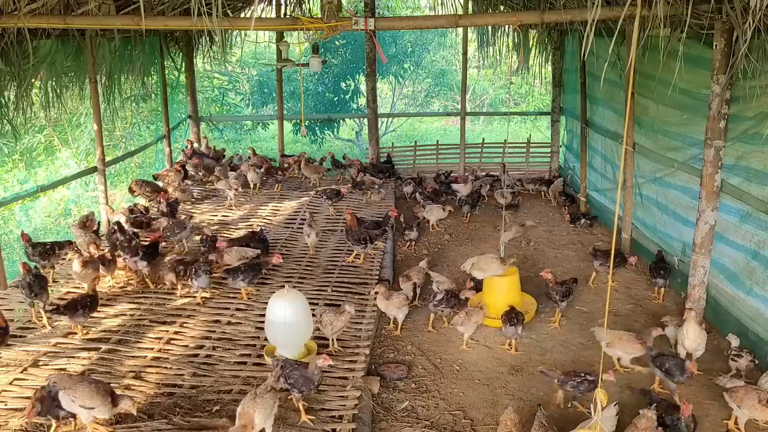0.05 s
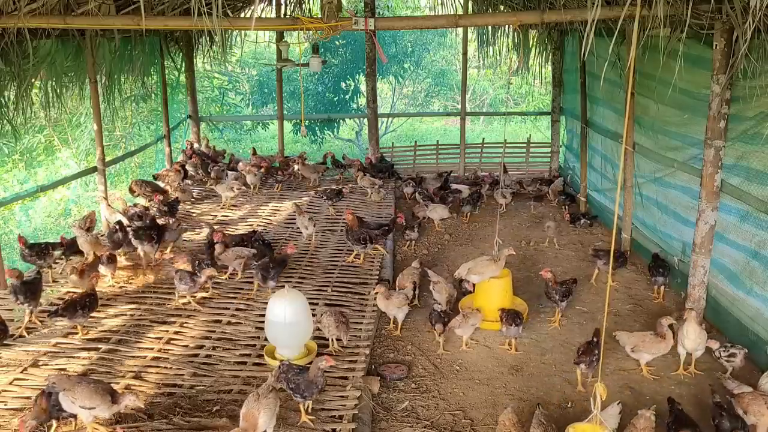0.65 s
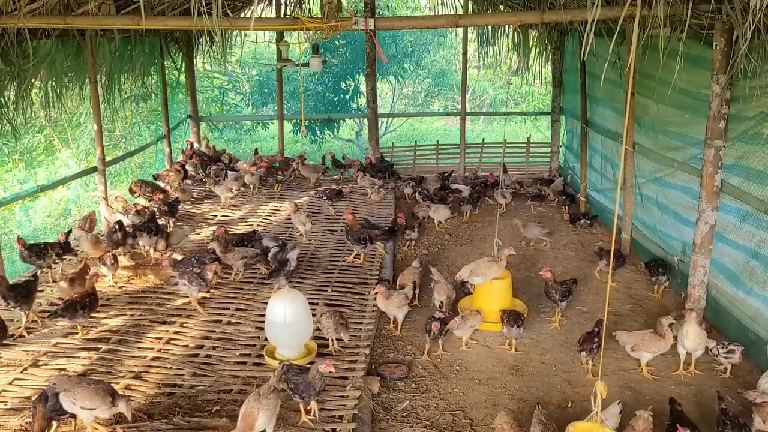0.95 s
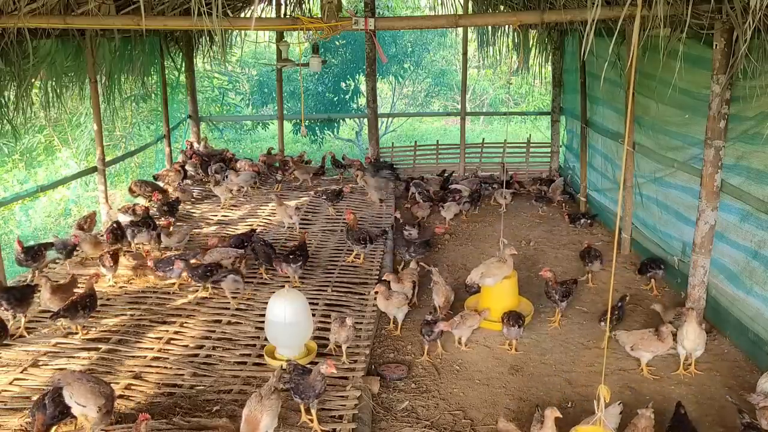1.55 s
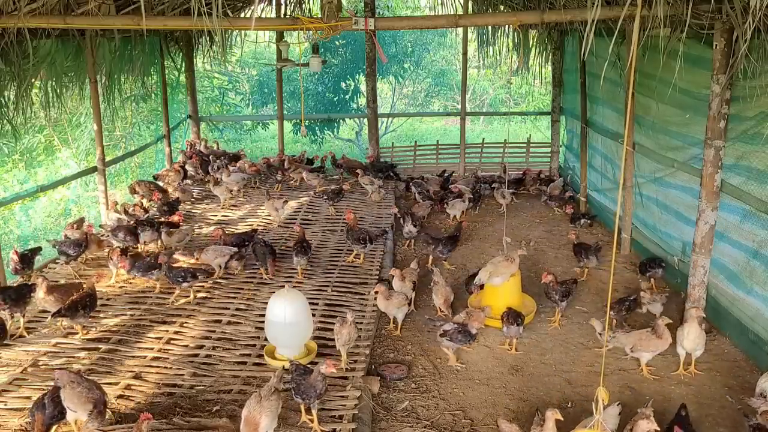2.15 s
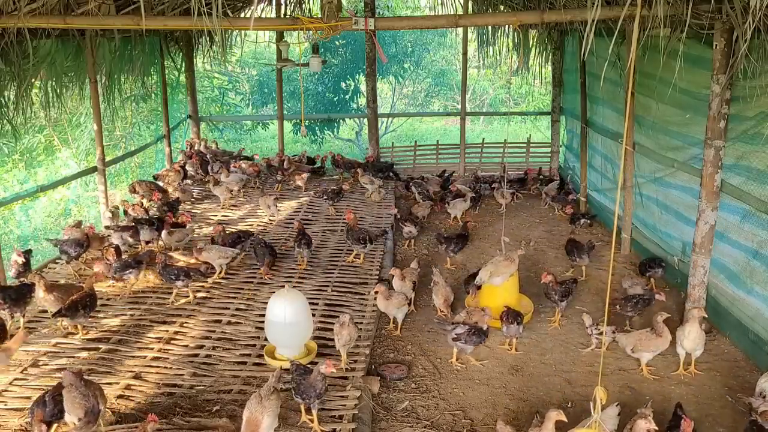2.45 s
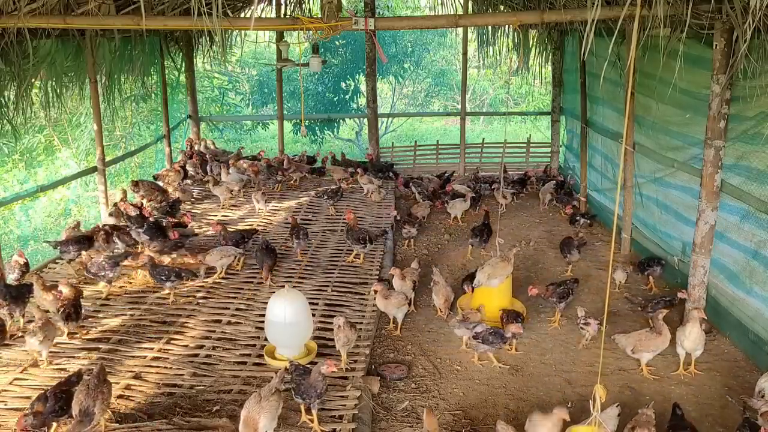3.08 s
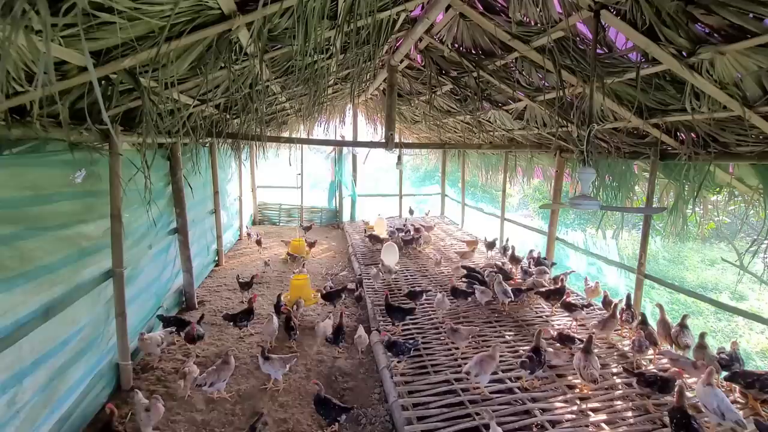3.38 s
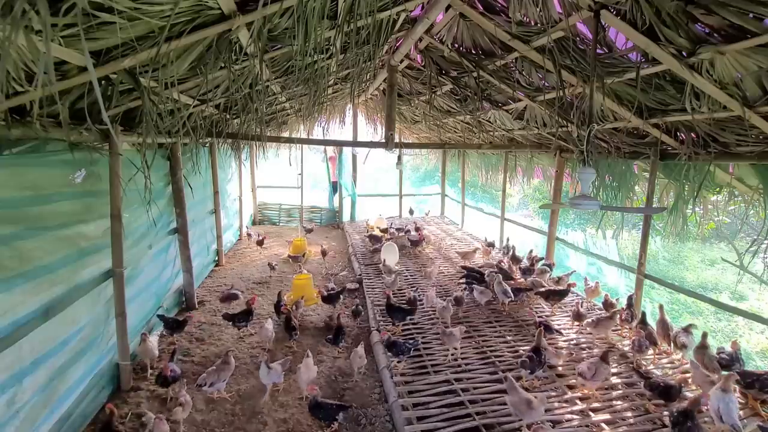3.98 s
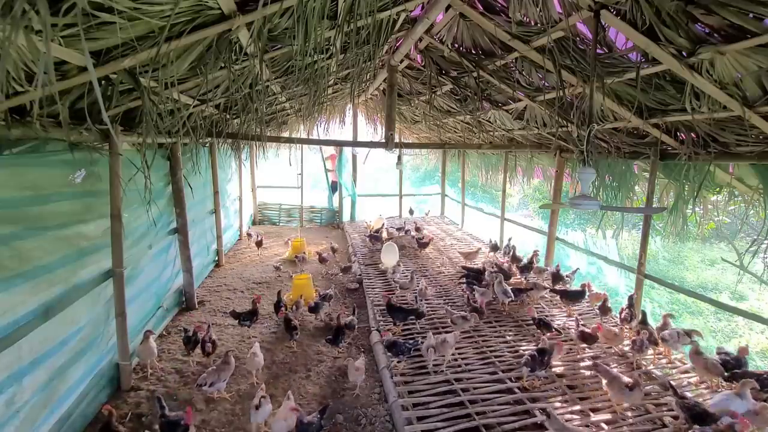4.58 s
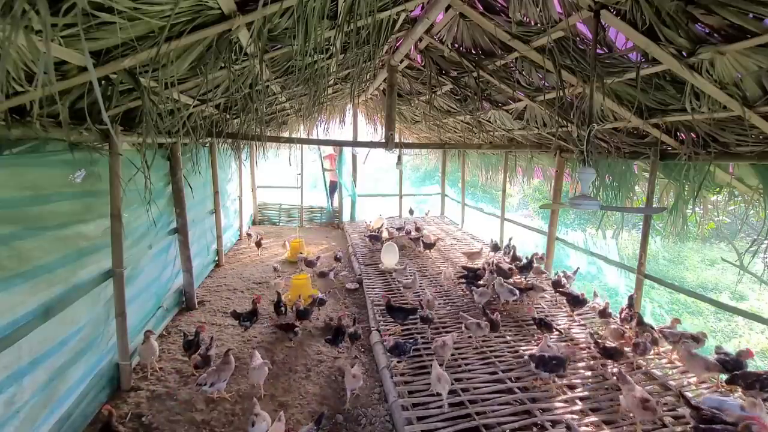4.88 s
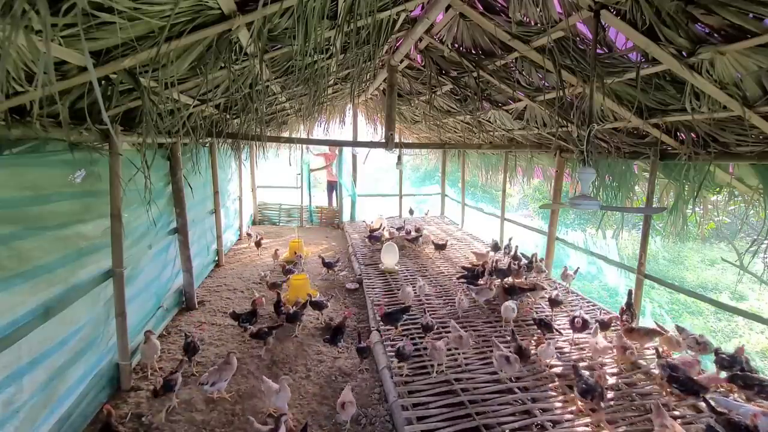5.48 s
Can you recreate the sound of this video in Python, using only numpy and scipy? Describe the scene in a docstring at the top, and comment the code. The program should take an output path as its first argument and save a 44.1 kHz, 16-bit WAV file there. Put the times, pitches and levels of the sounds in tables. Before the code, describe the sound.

A large flock of young chickens peeps continuously inside a thatched coop, near birds standing out with falling cheeps and brief hoarse squawks. Beaks tick, feet scratch through straw and wings thump softly on bamboo slats. Crickets trill outside and an engine thuds faintly far off. After a quavering call and a brief silence midway, the flock returns without the engine and grows busier.

```python
"""A thatched coop with netted sides, where young chickens peep and squawk, peck and flap on bamboo slats.
Each voice is a modulated tone from the membranes of the syrinx; impacts excite the modes of the floor.
Outside, crickets stridulate and the exhaust pulses of a slow single-cylinder engine thud far off.
After a brief silence the flock is heard from the other end of the coop, without the engine and with
one cricket nearer."""
import sys
import numpy as np
from scipy import signal
from scipy.fft import rfft, irfft, next_fast_len
from scipy.io import wavfile
from scipy.ndimage import map_coordinates

SR = 44100
rng = np.random.default_rng(int(sys.argv[2]) if len(sys.argv) > 2 else 0)


def inscribe(sig):
    """Save sig as 16-bit PCM at rate SR to the path in sys.argv[1].

    A 1-D sig is mono; a 2-D sig holds one channel per row.
    Samples are clipped to [-1, 1] before scaling.
    """
    pcm = np.round(np.clip(np.atleast_2d(sig).T, -1, 1) * 32767)
    wavfile.write(sys.argv[1], SR, pcm.astype(np.int16))


N = 243873
TIME = np.arange(N) / SR
MOVE_S = 3.37  # from here on the listener is at the other end


def undb(db):
    """Amplitude ratio of a level in decibels."""
    return 10 ** (np.asarray(db) / 20)


def unit(x):
    """Normalisation to unit rms."""
    return x / np.sqrt(np.mean(x ** 2) + 1e-20)


def curve(table, axis=1):
    """Linear interpolation of one column of a table over time."""
    rows = np.array(table)
    return np.interp(TIME, rows[:, 0], rows[:, axis])


def response(hz, points):
    """Magnitude response, interpolated in decibels over log frequency."""
    f, db = np.transpose(points)
    return undb(np.interp(np.log(hz + 1e-9), np.log(f), db, left=-90, right=-90))


def colour(x, points):
    """Zero-phase filtering by multiplication of spectra."""
    n = x.shape[-1]
    size = next_fast_len(n)
    return irfft(rfft(x, size) * response(np.fft.rfftfreq(size, 1 / SR), points), size)[..., :n]


def wander(n, rate):
    """Smooth random modulation of spread near 1, through `rate` random values a second."""
    knots = rng.standard_normal(int(n / SR * rate) + 4)
    return map_coordinates(knots, [np.arange(n) / SR * rate + 1], order=2, mode="nearest")


def stereo_noise(n, side):
    """Partly coherent noise at the two ears: side 0 is centred, side 1 diffuse."""
    mid, wide = rng.standard_normal((2, n))
    return np.array([mid + side * wide, mid - side * wide])


def add(out, s, sound, pan_db=0, lag=0):
    """Mix in at time s with interaural differences: the left ear is pan_db louder, lag samples earlier."""
    for ear, sign, x in zip(out, (1, -1), np.broadcast_to(sound, (2, sound.shape[-1]))):
        start = int(np.clip(s * SR - sign * lag / 2, 0, N))
        gain = undb(sign * pan_db / 2) / np.sqrt(np.cosh(pan_db * np.log(10) / 20))
        ear[start:start + len(x)] += x[:N - start] * gain


def lead(s, scatter=0):
    """Interaural delay of a near bird in samples; it scatters because each stands somewhere else."""
    return (3 if s < MOVE_S else -2.1) + (scatter * rng.normal() if scatter else 0)


def coop(x, t60_s, wet_db):
    """Reverberation: thatch and netting return only a short, sparse train of echoes."""
    t = np.arange(SR // 4) / SR
    echoes = rng.standard_normal((2, len(t))) * (rng.random((2, len(t))) < .05)
    echoes *= (t > .003) * undb(-60 * t / t60_s)
    echoes /= np.sqrt(np.sum(echoes ** 2, axis=1, keepdims=True))
    return x + undb(wet_db) * signal.fftconvolve(x, echoes, axes=1)[:, :x.shape[1]]


def placed(note, t60_s=0.18, wet_db=-5.5, bounce_db=-11, bounce_s=0.004):
    """Comb filtering: reflections off floor and posts colour each call anew, at constant energy."""
    direct = np.pad(note, (0, SR // 8))
    delays = (rng.uniform(.1, 1, (2, 2)) * bounce_s * SR).astype(int)
    early = np.array([direct + undb(bounce_db) * sum(np.roll(direct, d) for d in ear) for ear in delays])
    heard = coop(early, t60_s, wet_db)
    return heard * np.sqrt(np.sum(note ** 2) / np.sum(heard ** 2, axis=1, keepdims=True))


# Background spectrum: f/Hz, level/dB (levels in all tables are relative)
AIR_SPECTRUM = [(25, -24), (60, 8.5), (150, -22), (400, -18), (900, -7), (2000, -9.5), (5000, -14.5),
                (16000, -15.5)]
def air():
    """Diffuse background noise, strongest in the bass."""
    return unit(colour(stereo_noise(N, 1.0), AIR_SPECTRUM)) * undb(-67.5)


def wing_stroke(hz, length, drop):
    """Stridulation: one stroke of a cricket's file, sinking in pitch as the wings slow."""
    u = np.linspace(0, 1, int(length * SR))
    return np.sin(2 * np.pi * np.cumsum(hz * (1 - drop * u)) / SR) * np.sin(np.pi * u)


# Trilling crickets: f/Hz, stroke rate/Hz, fractional fall in pitch, level/dB
CRICKET_TRILLS = [(4466, 27.5, 0.062, -51.5), (4333, 33, 0.018, -50), (4840, 19, 0.062, -54.5),
                  (5150, 31, 0.16, -51)]
# Spectrum of the chorus at the first end: f/Hz, level/dB
FIRST_CHORUS = [(2290, -43), (3900, 4.5), (3970, -14.5), (4210, 10), (4410, 10.5), (4930, 7), (5090, 4.5),
                (5340, -18.5), (5600, -17), (7280, -31.5), (9900, -33), (10800, -7.5), (11700, -32),
                (13000, -80)]
def distant_crickets():
    """Superposition: pulsed trills and one dying note over a chorus blurred to noise; all slowly weaken."""
    out = np.zeros((2, N))
    for hz, rate, drop, db in CRICKET_TRILLS:
        for s in np.arange(0, MOVE_S, 1 / rate):
            stroke = wing_stroke(hz * (1 + 0.0043 * rng.normal()), 0.0218, drop)
            add(out, s + .0015 * rng.normal(), stroke * undb(db + 3.3 * rng.normal()), lag=2.55)
    ringing_hz = 4200 * (1 + 0.0129 * wander(N, 90))
    out += np.sin(2 * np.pi * np.cumsum(ringing_hz) / SR) * undb(-48 - 12 * TIME)
    out += unit(colour(stereo_noise(N, 1), FIRST_CHORUS)) * undb(-49.5 + 2.3 * wander(N, 70))
    return out * undb(1 - 0.86 * TIME) * (TIME < MOVE_S)


# Running of the engine: t/s, firing rate/Hz, level/dB
ENGINE_RUN = [(0.0, 28.38, -52), (1.41, 26.73, -55.5), (2.02, 28.81, -54), (2.47, 30, -56),
              (2.95, 32.68, -59), (3.3, 35.45, -59)]
# Spectrum of the distant exhaust: f/Hz, level/dB
EXHAUST_SPECTRUM = [(20, -26.5), (38, -15), (55, -0.5), (85, -6), (112, 2.5), (140, 0.5), (175, -17.5),
                    (260, -7), (400, -44.5), (900, -82)]
def engine():
    """Source and filter: uneven firing pulses and noise excite the exhaust; distance leaves the bass."""
    cycles = np.floor(np.cumsum(curve(ENGINE_RUN)) / SR)
    firings = np.diff(cycles, prepend=0) * undb(2 * wander(N, 25.42))
    thuds = unit(colour(unit(firings) + stereo_noise(N, 0.27), EXHAUST_SPECTRUM))
    out = np.zeros((2, N))
    add(out, 0, thuds * undb(curve(ENGINE_RUN, axis=2) + 2.0) * (TIME < MOVE_S), lag=16)
    return out


# Activity of the flock: t/s, level/dB
FLOCK_ACTIVITY = [(0.0, -47.5), (0.42, -49), (1.3, -52), (2.13, -53.5), (2.6, -57), (2.9, -40),
                  (3.1, -52.5), (3.58, -64), (3.744, -56.5), (4.636, -51), (5.008, -45), (5.53, -45.5)]
def bustle_db():
    """Common envelope of the flock's faint sounds, in decibels above its usual activity."""
    return curve(FLOCK_ACTIVITY) + 50


# Spectra of the straw and of the floor under it: f/Hz, level/dB
STRAW_SPECTRUM = [(3180, -16.5), (5400, -4), (6390, -8.5), (8030, -5), (8810, -13), (10800, -3.5),
                  (13600, -21.5), (14900, -20), (15500, -30)]
FLOOR_SPECTRUM = [(90, -1), (170, -9), (280, 2), (420, -5), (600, -6.5), (900, -12.5), (1400, -15),
                  (2500, -33)]
def shuffling():
    """Random impacts of many feet sum to noise: crackling straw above, a dull patter below."""
    snaps = (rng.random(N) < 70 / SR) * np.minimum(undb(4.0 * rng.exponential(size=N)), 6)
    rustle = np.exp(0.073 * wander(N, 500) + 0.32 * wander(N, 21.97))
    crackle = signal.lfilter([1], [1, -np.exp(-1 / (0.00043 * SR))], snaps)
    straw = unit(colour(stereo_noise(N, 0.97) * (rustle + 0.53 * crackle), STRAW_SPECTRUM))
    patter = unit(colour(stereo_noise(N, 0.34) * np.exp(0.36 * wander(N, 35)), FLOOR_SPECTRUM))
    return straw * undb(-60.5 + 0.45 * bustle_db()) + patter * undb(-60 + 0.74 * bustle_db())


# Response of throat and open beak to the overtones: f/Hz, level/dB
VOCAL_TRACT = [(600, -30), (1400, 3), (2400, 15.5), (3400, 1.5), (4800, 4.5), (6000, -9.5), (7700, -2),
               (10000, -5), (15000, -50.5)]
def syrinx(glide, waver, waver_hz, flutter, overtone_db, rasp, spread):
    """A harmonic whistle under random modulation of frequency (waver) and amplitude (flutter)."""
    n = len(glide)
    phase = 2 * np.pi * np.cumsum(glide * (1 + waver * wander(n, waver_hz))) / SR
    overtones = sum(response(k * glide, VOCAL_TRACT) * np.sin(k * phase) / (k - 1) for k in range(2, 6))
    # irregular flapping of the membranes adds noisy sidebands, heard as rasp
    spread_hz = spread * glide.mean()
    whistle = (1 + rasp * wander(n, spread_hz)) * np.sin(phase)
    whistle += rasp * wander(n, spread_hz) * np.cos(phase)
    envelope = unit(np.exp(flutter * wander(n, waver_hz)))
    return np.sqrt(2) * (whistle + undb(overtone_db) * overtones) * envelope


def call(length, pitches, edge_s, **voice):
    """A parabolic frequency glide through three pitches, with raised-cosine edges."""
    t = np.arange(int((length + edge_s) * SR)) / SR
    progress = np.clip((t - edge_s / 2) / length, -.1, 1.1)
    glide = np.polyval(np.polyfit([0, .5, 1], pitches, 2), progress)
    opening = np.sin(np.pi / 2 * np.clip(np.minimum(t, t[-1] - t) / edge_s, 0, 1)) ** 2
    return syrinx(glide, **voice) * opening


def fall(start_hz, end_hz, sag=0):
    """Start, middle and end frequency of a glide that sags below a straight line."""
    return np.array([start_hz, (start_hz + end_hz) / 2 * (1 - sag), end_hz])


def far_peeps(count=460):
    """Incoherent sum of many faint falling peeps from the rest of the flock."""
    out = np.zeros((2, N))
    for k, (when, span, pitch, drop, loud, place) in enumerate(rng.random((count, 6))):
        top_hz = 2250 + 1550 * pitch
        pitches = top_hz * (1 - (0.0726 + .22 * drop) * np.array([0, .42, 1]))
        note = call(0.02817 + .055 * span, pitches, edge_s=0.0144, waver=0.012, waver_hz=198,
                    flutter=0.25, overtone_db=-32.5, rasp=0.4, spread=0.29)
        s = (k + when) / count * N / SR - .04
        add(out, s, note * undb(7.6 * loud - 3 * pitch), 10 * (place - .5), lag=36 * (place - .5))
    return unit(out) * undb(-51.5 + 0.78 * bustle_db())


def pip(length, hz):
    """A closed-beak note with weak harmonics that glides down onto its pitch."""
    return call(length, hz * np.array([1.076, 1, 0.983]), edge_s=0.013, waver=0.015, waver_hz=285,
                flutter=0.2, overtone_db=-22, rasp=0.17, spread=0.45)


# Low contact notes: t/s, duration/s, f/Hz, level/dB, left minus right/dB
CONTACT_NOTES = [(0.0, 0.003, 1640, -35.5, 3), (0.008, 0.016, 1050, -52.5, 5),
                 (0.087, 0.0087, 1582, -45.5, 7), (0.23, 0.066, 1522, -54.5, 0),
                 (0.382, 0.053, 1536, -58.5, 4), (0.728, 0.02, 1465, -49, 5),
                 (0.789, 0.018, 1238, -50.5, 5), (1.026, 0.03, 1021, -50, -6),
                 (1.068, 0.02, 1244, -46.5, 6), (1.122, 0.031, 1574, -49.5, -2),
                 (1.586, 0.029, 1393, -52, -1), (2.048, 0.025, 1324, -47.5, 3),
                 (2.433, 0.0088, 1247, -48.5, 1), (2.544, 0.014, 1317, -50.5, 8),
                 (3.677, 0.044, 1458, -55, -6), (4.06, 0.031, 1267, -52.5, -3),
                 (4.183, 0.016, 1560, -57, 0), (4.252, 0.03, 1543, -56, -5), (4.434, 0.036, 1152, -53, -4),
                 (4.477, 0.011, 1546, -50, 1), (4.633, 0.019, 1666, -51, 1), (4.76, 0.023, 1271, -46, -1),
                 (4.823, 0.041, 1496, -57, -1), (4.938, 0.016, 1330, -52.5, 1),
                 (5.481, 0.045, 1320, -49, -2.5)]
def near_pips():
    """Direct sound and reflections of soft contact notes close by."""
    out = np.zeros((2, N))
    for s, length, hz, db, pan_db in CONTACT_NOTES:
        note = placed(pip(length, hz), t60_s=0.14, wet_db=-3.5)
        add(out, s - 0.008, note * undb(db + 5.5), pan_db, lag=lead(s, scatter=11.3))
    return out


def far_pips(count=36):
    """Faint contact notes, spread over the coop by interaural level and time differences."""
    out = np.zeros((2, N))
    for k, (when, span, pitch, loud, place) in enumerate(rng.random((count, 5))):
        note = pip(0.026 + 0.036 * span, 1250 + 600 * pitch) * undb(3.7 * loud)
        add(out, (k + when) / count * N / SR, note, 8 * (place - .5), lag=36 * (place - .5))
    return unit(out) * undb(-62.5 + bustle_db())


# Mean spectrum of a click on straw or slat: f/Hz, level/dB
CLICK_SPECTRUM = [(400, -13), (1200, -5), (3000, 2), (6000, -7.5), (9000, -10), (12000, -12.5),
                  (17000, -14.5)]
def splinter(x, bright_hz, bright_db=8, octaves=0.15):
    """Resonance: each straw or slat filters a click with one bright peak and its own random ripple."""
    hz = np.geomspace(400, 16000, 40)
    mean_db = 20 * np.log10(response(hz, CLICK_SPECTRUM) + 1e-5)
    peak_db = bright_db * np.exp(-(np.log2(hz / bright_hz) / octaves) ** 2)
    ripple_db = 3.1 * rng.standard_normal(len(hz))
    return colour(x, np.transpose([hz, mean_db + peak_db + ripple_db]))


def claw_ticks(count=40):
    """Light impacts of claws all over the slats, stronger when the flock is busy."""
    out, t = np.zeros((2, N)), np.arange(SR // 25) / SR
    for k, (when, loud, place, size) in enumerate(rng.random((count, 4))):
        tick = splinter(stereo_noise(len(t), 1.0) * np.exp(-t / 0.012), 5000 + 8000 * size)
        add(out, (k + when) / count * N / SR - .02, unit(tick) * undb(3 * loud), 8 * (place - .5))
    return unit(out) * undb(-65 + 0.45 * bustle_db())


# Beaks and claws on the slats: t/s, level/dB, resonance f/Hz, share of scrape
BEAK_STRIKES = [(0.0653, -47, 13200, 0.28), (1.2895, -42.5, 12000, 0.76), (1.666, -43, 6800, 0.45),
                (2.2872, -42.5, 8500, 0.053), (2.3333, -43.5, 12200, 0.41), (2.5735, -38.5, 7900, 0.2),
                (2.6773, -47, 6120, 0.21), (3.1643, -41, 5500, 0.45), (3.5773, -45, 5360, 0.93),
                (4.319, -37.5, 5840, 0.11), (4.393, -40, 5400, 0.38), (4.5316, -43.5, 5520, 0.18),
                (4.6555, -45.5, 5650, 0.47), (4.8583, -43, 7740, .4), (5.064, -43, 7900, 0.31),
                (5.1948, -43, 7600, 0.097), (5.2929, -41, 5860, 0.36), (5.428, -37.5, 10900, 0.27),
                (5.482, -41, 7610, .4)]
def pecks():
    """Impact and friction: a brief contact gives a broadband tick, trailed by an uneven scrape."""
    out, t = np.zeros((2, N)), np.arange(SR // 8) / SR
    for s, db, bright_hz, share in BEAK_STRIKES:
        scrape = share * np.exp(-t / 0.031) * np.exp(.5 * wander(len(t), 140))
        envelope = (np.exp(-t / 0.003) + scrape) * (1 - np.exp(-t / 0.0008))
        tick = splinter(stereo_noise(len(t), 1.0) * envelope, bright_hz)
        add(out, s, tick / np.abs(tick).max() * undb(db + 8), pan_db=-2.5 * rng.normal())
    return out


# Modes of the slatted floor: f/Hz, level/dB, T60/s
SLAT_MODES = [(330, 8, 0.028), (270, -22.5, 0.13), (518, -6.5, 0.039), (690, -9, 0.031), (1306, -8, 0.036)]
def slat_ring(t, detune=0):
    """Free vibration of the bamboo floor: a sum of exponentially damped modes."""
    return sum(undb(db - 60 * t / t60) * np.sin(2 * np.pi * hz * (1 + detune) * t)
               for hz, db, t60 in SLAT_MODES)


# Wing beats and hops: t/s, level/dB
WING_BEATS = [(0.094, -50.5), (1.304, -47), (1.369, -49.5), (1.532, -45), (1.915, -46), (2.368, -48.5),
              (2.579, -53.5), (2.767, -39.5), (2.916, -48.5), (2.982, -48.5), (3.281, -49), (4.342, -51),
              (4.436, -47.5), (4.657, -53), (4.907, -50.5), (5.435, -51.5)]
# Spectrum of a blow of wing or foot: f/Hz, level/dB
THUD_SPECTRUM = [(100, -30.5), (190, -5.5), (300, -1.5), (450, -7.5), (650, -5), (1000, -14.5),
                 (2500, -24.5), (6000, -31.5), (14000, -41.5)]
def flaps():
    """Soft impacts of wings and feet excite the floor's modes; a rustle of feathers follows."""
    out, t = np.zeros((2, N)), np.arange(SR // 3) / SR
    attack = 1 - np.exp(-t / 0.002)
    for s, db in WING_BEATS:
        feathers = 0.21 * np.exp(-t / 0.08 + .5 * wander(len(t), 45))
        thud = unit(colour(stereo_noise(len(t), 0.33), THUD_SPECTRUM)) * (np.exp(-t / 0.022) + feathers)
        ring = slat_ring(t, detune=0.17 * rng.normal())  # no two slats have the same pitch
        add(out, s - .002, (thud + undb(-5) * ring) * attack * undb(db + 1))
    return out


# Peeps of the nearest chicks: t/s, duration/s, start f/Hz, end f/Hz, level/dB, left minus right/dB
NEAR_PEEPS = [(0.133, 0.048, 2870, 2770, -41.5, 7), (0.197, 0.045, 2420, 2140, -45, 0),
              (0.263, 0.023, 3680, 3100, -40, -1), (0.284, 0.031, 2950, 2556, -38, 3),
              (0.325, 0.063, 2683, 2563, -45, 2), (0.328, 0.025, 3300, 3230, -42, 0),
              (0.616, 0.052, 2940, 2700, -43, 3), (0.702, 0.058, 3210, 2600, -44, 4),
              (0.817, 0.1, 2790, 2605, -48.5, 1), (0.98, 0.05, 2780, 2720, -54, -3),
              (1.081, 0.032, 2470, 2180, -49.5, 0), (1.123, 0.093, 3030, 2880, -49, -5),
              (1.211, 0.028, 3470, 3460, -47.5, -1), (1.201, 0.078, 2580, 2510, -50.5, -1),
              (1.391, 0.034, 3300, 3100, -54, 1), (1.446, 0.027, 2800, 2266, -52, 2),
              (1.476, 0.024, 3900, 3800, -47.5, -8), (1.5, 0.03, 3680, 3100, -48, 2),
              (1.724, 0.044, 2930, 2470, -50.5, 2), (1.926, 0.025, 3640, 3470, -49.5, 2),
              (2.021, 0.023, 3480, 3080, -54, -4), (2.346, 0.027, 3500, 3480, -47.5, 6),
              (2.374, 0.066, 3175, 2440, -48, 5), (2.539, 0.019, 3210, 3140, -43.5, -4),
              (2.589, 0.059, 2445, 2077, -55, 6), (2.734, 0.021, 3300, 3080, -41.5, -4),
              (2.772, 0.022, 2600, 2350, -49, -1.5), (2.959, 0.024, 2600, 2490, -44, 4),
              (3.012, 0.031, 3470, 3190, -43, 1), (3.047, 0.041, 3000, 2490, -51.5, 0),
              (3.408, 0.052, 2880, 2170, -59.5, 0), (3.521, 0.055, 3230, 3000, -56, 2),
              (3.581, 0.034, 2760, 2710, -53.5, 5), (3.582, 0.065, 2455, 2040, -57, -1),
              (3.653, 0.033, 3640, 3190, -49, -1), (3.667, 0.038, 3080, 2906, -46.5, -3),
              (3.669, 0.051, 2540, 2190, -50, 4), (3.732, 0.023, 2750, 2360, -48.5, 1),
              (3.791, 0.037, 3460, 3320, -51.5, -5), (3.792, 0.043, 3090, 2670, -47, 2),
              (3.796, 0.048, 2520, 2214, -48.5, 2), (3.872, 0.095, 3174, 2294, -50, 2),
              (3.896, 0.048, 3660, 3240, -54, 4), (3.911, 0.033, 2520, 2100, -49.5, 3),
              (3.958, 0.0305, 3130, 2570, -44.5, 4), (4.06, 0.028, 3600, 2580, -43.5, 4),
              (4.186, 0.029, 3240, 2450, -42, 2), (4.222, 0.062, 4070, 2476, -48.5, 2),
              (4.292, 0.084, 3180, 2624, -50, 8), (4.31, 0.031, 2530, 2250, -47, -1),
              (4.348, 0.032, 3670, 2506, -44, -1), (4.416, 0.064, 3670, 3120, -53.5, 1),
              (4.502, 0.1, 2925, 2335, -51.5, 9), (4.52, 0.022, 2170, 2130, -47.5, -1),
              (4.664, 0.037, 3770, 3090, -52, 1), (4.718, 0.06, 3220, 2730, -42.5, 1),
              (4.788, 0.029, 3520, 2825, -41, 2), (4.837, 0.043, 3900, 2900, -47.5, 1),
              (5.088, 0.036, 3940, 3250, -46, 0), (5.165, 0.036, 2820, 2463, -42.5, 0),
              (5.21, 0.067, 3030, 2195, -52.5, 8), (5.295, 0.044, 3330, 2380, -42.5, 3),
              (5.314, 0.023, 3840, 3510, -43, 3), (5.393, 0.025, 3520, 3300, -53, 2),
              (5.448, 0.042, 2470, 2110, -51, -1), (5.515, 0.013, 4050, 3570, -41, 1)]
def peeps(edge_s=.016):
    """Falling whistles whose modulation deepens with loudness and steepness of glide."""
    out = np.zeros((2, N))
    for s, length, start_hz, end_hz, db, pan_db in NEAR_PEEPS:
        octaves_per_s = np.log2(start_hz / end_hz) / length
        effort = undb(0.13 * (db + 48.5) + 0.12 * octaves_per_s)
        note = call(length, fall(start_hz, end_hz, sag=0.0039), edge_s, waver=0.014 * effort,
                    waver_hz=263, flutter=0.29, overtone_db=-17, rasp=0.16 * effort, spread=0.44)
        heard = placed(note, t60_s=0.22) * undb(db + 3)
        add(out, s - edge_s / 2, heard, pan_db, lag=lead(s, scatter=1.2))
    return out


# Hoarse calls: t/s, duration/s, start f/Hz, end f/Hz, level/dB, left minus right/dB
HOARSE_CALLS = [(0.33, 0.06, 2750, 2464, -50.5, 4), (0.474, 0.019, 2580, 2320, -47, 1),
                (0.585, 0.017, 2810, 2650, -44, 5), (0.664, 0.0083, 2586, 2530, -35.5, 2),
                (0.671, 0.11, 2258, 1766, -51, -2), (0.94, 0.0162, 2546, 2220, -44, 2),
                (0.804, 0.078, 2390, 1970, -54.5, -2), (1.042, 0.044, 2900, 2395, -49, 0),
                (1.65, 0.044, 1524, 1590, -51, 5), (3.048, 0.0092, 1585, 1555, -42, 0),
                (3.15, 0.02, 2820, 2360, -47.5, 2), (3.211, 0.0573, 1805, 1566, -46, 0.5),
                (3.23, 0.034, 2613, 2150, -50.5, -1), (4.766, 0.038, 2363, 2017, -44, 4),
                (4.965, 0.022, 1545, 1670, -43, -2), (4.975, 0.043, 2600, 2193, -43.5, 0),
                (5.051, 0.093, 2484, 2614, -53.5, 7)]
def squawks(edge_s=.0095):
    """Aperiodic vibration: the higher the voice is forced, the more it breaks up."""
    out = np.zeros((2, N))
    for s, length, start_hz, end_hz, db, pan_db in HOARSE_CALLS:
        pitches = fall(start_hz, end_hz)
        strain = min(pitches[1] / 2200, 1)
        note = call(length, pitches, edge_s, waver=0.048 * strain, waver_hz=474,
                    flutter=0.4, overtone_db=-13, rasp=0.5 * strain, spread=0.5)
        add(out, s - edge_s / 2, placed(note) * undb(db + 4.5), pan_db, lag=lead(s, scatter=4.9))
    return out


def during(points):
    """The samples spanned by a contour."""
    return (TIME >= points[0][0]) & (TIME < points[-1][0])


def long_call(points, quaver=0.035, quaver_hz=110, **voice):
    """Random frequency modulation about a contour of pitch and level gives a quavering note."""
    held = during(points)
    glide = curve(points)[held] * (1 + quaver * wander(held.sum(), quaver_hz))
    return syrinx(glide, **voice) * undb(curve(points, axis=2)[held])


# One contour for each cry: t/s, f/Hz, level/dB
CRY_CONTOURS = [
    [(0.405, 4050, -49), (0.435, 3835, -42), (0.46, 3050, -40), (0.468, 2147, -31.5), (0.476, 2636, -34.5),
     (0.489, 1503, -38.5), (0.497, 1400, -42)],
    [(0.553, 3750, -47), (0.562, 3010, -42), (0.566, 2670, -34.5), (0.574, 2935, -42), (0.583, 2410, -37),
     (0.59, 1585, -34), (0.6, 1510, -51)],
    [(1.022, 3450, -45), (1.04, 3250, -37), (1.053, 2147, -43), (1.06, 2697, -48), (1.078, 1503, -41),
     (1.09, 1260, -51)],
    [(1.805, 3550, -47), (1.845, 3400, -47), (1.868, 2457, -50), (1.885, 2050, -41.5), (1.9, 1500, -45),
     (1.918, 1290, -50)],
    [(4.849, 2770, -41), (4.857, 2052, -30.5), (4.864, 2257, -33.5), (4.870, 2580, -31), (4.877, 2100, -29),
     (4.884, 2143, -32.5), (4.889, 2380, -42), (4.9, 2180, -47)],
    [(4.89, 4000, -54), (4.925, 3800, -42), (4.948, 3550, -40), (4.955, 3340, -32), (4.968, 2700, -33),
     (4.979, 3200, -36), (4.989, 2202, -36), (4.999, 2690, -29.5), (5.014, 1834, -32.5), (5.028, 2360, -46)],
]
def cries(buckle_hz=3000):
    """A change of register: a jostled bird's whistle starts high, then buckles and tumbles hoarsely."""
    out = np.zeros((2, N))
    for points in CRY_CONTOURS:
        s = points[0][0]
        hoarse = .5 + .5 * (curve(points)[during(points)] < buckle_hz)
        note = long_call(points, waver=0.035 * hoarse, waver_hz=452, flutter=0.26,
                         overtone_db=-14.5, rasp=0.34 * hoarse, spread=0.46)
        add(out, s, placed(note * undb(-1.5), t60_s=0.25), pan_db=3, lag=lead(s))
    return out


# Feet raking the litter: t/s, duration/s, level/dB, resonance f/Hz
RAKE_STROKES = [(0.431, 0.087, -52.5, 12300), (0.545, 0.063, -53.5, 6900), (1.008, 0.069, -51, 11100),
                (1.272, 0.059, -59, 8000), (1.341, 0.058, -58, 13000), (1.755, 0.074, -54.5, 13500),
                (2.344, 0.059, -55, 11100), (2.593, 0.037, -64, 13500), (2.698, 0.086, -58, 7000),
                (2.882, 0.11, -52.5, 12200), (3.204, 0.07, -52, 12100), (4.206, 0.087, -60, 7000),
                (4.677, 0.05, -56, 11200), (4.853, 0.062, -50.5, 10500), (4.955, 0.072, -49.5, 7560)]
def scuffs():
    """Friction noise swells and fades as a foot drags through straw."""
    out = np.zeros((2, N))
    for s, length, db, bright_hz in RAKE_STROKES:
        n = int(length * SR)
        friction = stereo_noise(n, 1.0) * np.exp(0.2 * wander(n, 400)) * np.hanning(n)
        add(out, s, unit(splinter(friction, bright_hz)) * undb(db))
    return out


# Hard landings on the bamboo: t/s, peak level/dB
LANDINGS = [(1.532, -50), (2.774, -37.5), (4.4204, -30.5)]
def knocks():
    """Impact excitation: a landing bird's weight sets the slats ringing, and its claws clack."""
    out, t = np.zeros((2, N)), np.arange(SR // 5) / SR
    knock = slat_ring(t) * (1 - np.exp(-t / 0.0041)) ** 3
    for s, db in LANDINGS:
        clack = unit(colour(stereo_noise(len(t), 0.393), THUD_SPECTRUM)) * np.exp(-t / 0.0032)
        add(out, s, knock / np.abs(knock).max() * undb(db))
        add(out, s + 0.008, clack * undb(db - 11))
    return out


# A long call that arches up and drops back: t/s, f/Hz, level/dB
COMPLAINT_CONTOUR = [(2.834, 1490, -44), (2.848, 1617, -39), (2.868, 1754, -59), (2.879, 1818, -31),
                     (2.897, 1786, -29.5), (2.906, 1873, -41), (2.918, 1990, -37), (2.937, 1944, -44),
                     (2.948, 1937, -37), (2.965, 1950, -34.5), (3.009, 1954, -34), (3.015, 1620, -40),
                     (3.033, 1565, -36), (3.044, 1553, -54.5)]
def complaint():
    """Sustained oscillation: one bird holds a quavering, nearly pure tone."""
    out = np.zeros((2, N))
    note = long_call(COMPLAINT_CONTOUR, waver=0.028, waver_hz=260.8, flutter=0.36,
                     overtone_db=-20, rasp=0.23, spread=0.24)
    add(out, COMPLAINT_CONTOUR[0][0], placed(note * undb(2.5), wet_db=-0.5))
    return out


# Spectrum of the chorus at the other end: f/Hz, level/dB
SECOND_CHORUS = [(2290, -39), (3900, -5), (4020, -11.5), (4390, 1), (4650, 1.5), (4930, 1), (5370, -14),
                 (5600, -18), (7280, -48), (12300, -120)]
def other_end_crickets(start_s=3.485, period_s=0.2125, swell_db_per_s=5):
    """Periodic stridulation: a near cricket chirps in threes, growing louder, over the blurred chorus."""
    out = np.zeros((2, N))
    for since in np.arange(5) * period_s:
        stroke = wing_stroke(5000, 0.029, 0.168) * undb(-44.5 + swell_db_per_s * since)
        for k in range(3):
            add(out, start_s + since + k * 0.033, stroke, lag=1.84)
    out += unit(colour(stereo_noise(N, 1), SECOND_CHORUS)) * undb(-52 + 2 * wander(N, 60))
    return out * (TIME >= MOVE_S)


# Croons of an older bird far off: t/s, duration/s
CROON_NOTES = [(3.575, 0.074), (3.677, 0.059)]
def croons(hz=600):
    """Low, nearly level tones made husky by strong noise sidebands."""
    out = np.zeros((2, N))
    for s, length in CROON_NOTES:
        note = call(length, fall(1.03 * hz, .98 * hz), edge_s=0.0057, waver=0.04, waver_hz=196,
                    flutter=0.24, overtone_db=-35, rasp=0.53, spread=0.438)
        add(out, s, note * undb(-63))
    return out


def scene():
    """Superposition of the flock, its echoes in the coop and the countryside around."""
    voices = peeps() + near_pips() + squawks() + complaint() + cries()
    claws = coop(pecks() + scuffs() + claw_ticks(), t60_s=0.25, wet_db=-4.5)
    thuds = coop(flaps() + knocks(), t60_s=0.31, wet_db=-11)
    far = coop(far_peeps() + far_pips() + croons(), t60_s=0.092, wet_db=-2)
    background = air() + shuffling() + distant_crickets() + other_end_crickets() + engine()
    return voices + claws + thuds + far + background


# The brief silence between the two ends of the coop: t/s, level/dB
SILENCE = [(0, 0), (3.308, 0), (3.325, -42), (3.40, -60), (3.425, -11), (3.55, -7), (3.58, 0), (5.53, 0)]
def record(dry, cutoff_hz=15700):
    """Attenuation between the two places, then a steep low-pass filter on the top of the treble."""
    low_pass = signal.ellip(10, .2, 70, cutoff_hz, fs=SR, output="sos")
    return signal.sosfilt(low_pass, dry * undb(curve(SILENCE)))


dry = scene()
out = record(dry)
inscribe(out)
```